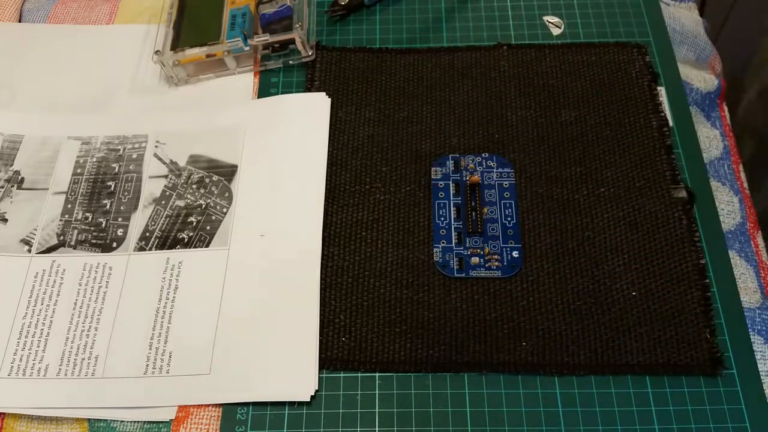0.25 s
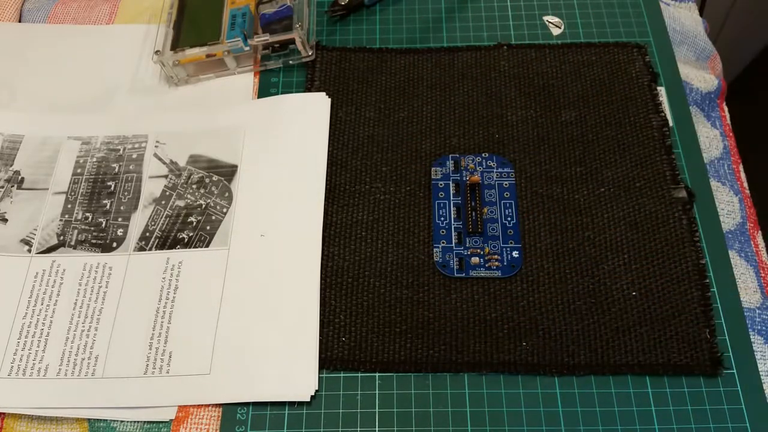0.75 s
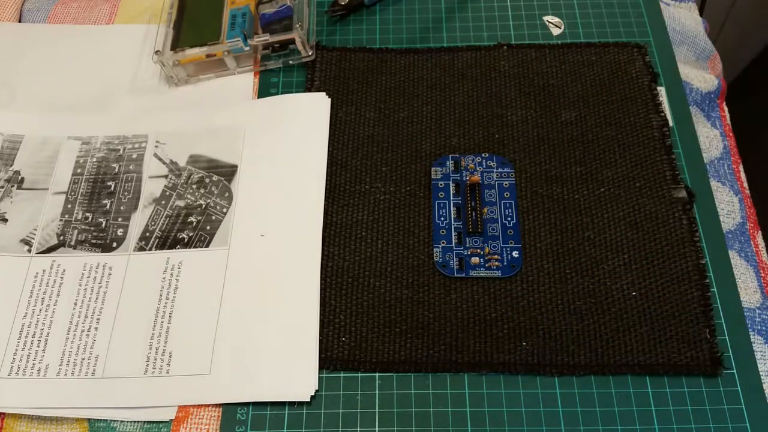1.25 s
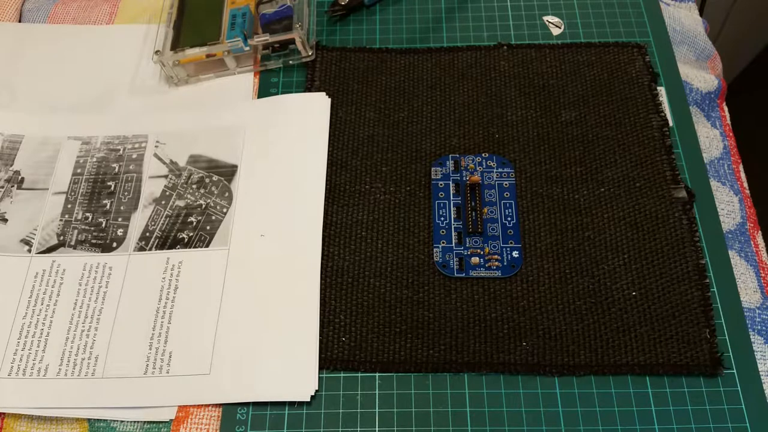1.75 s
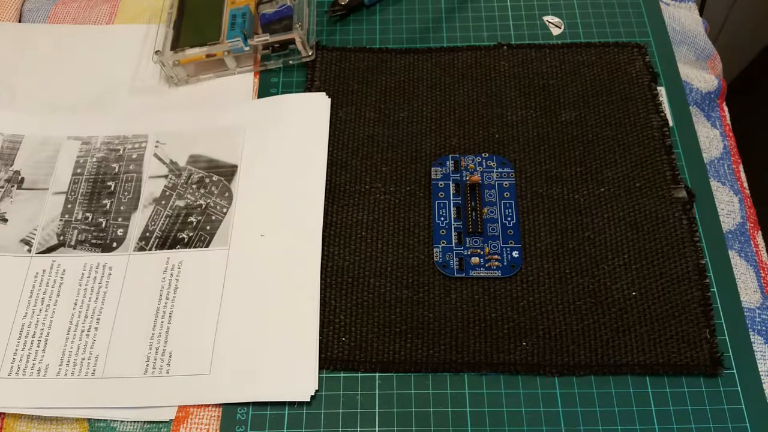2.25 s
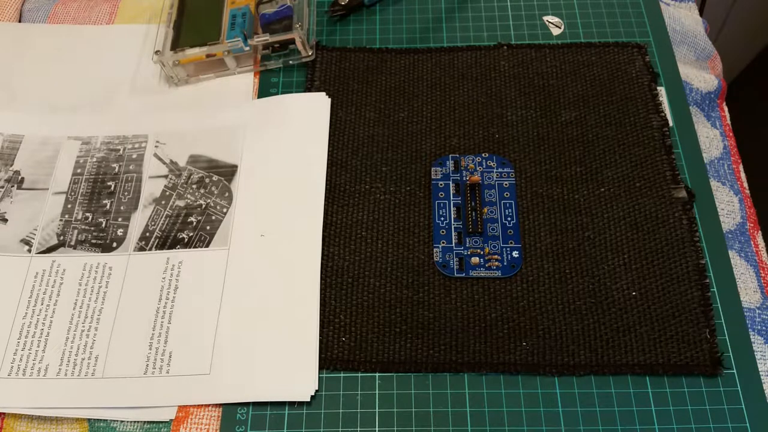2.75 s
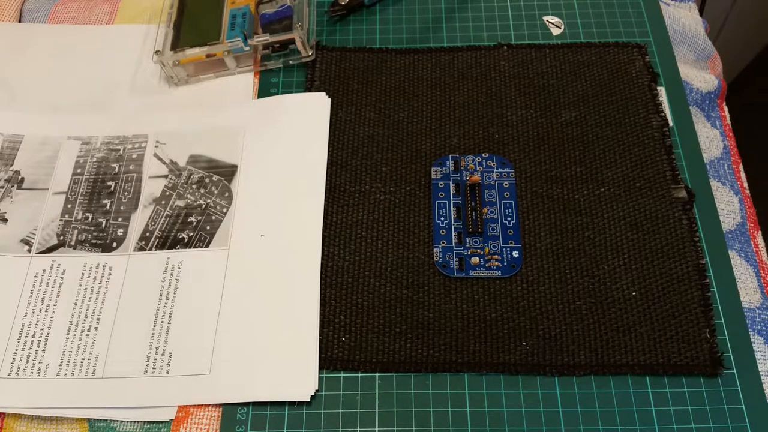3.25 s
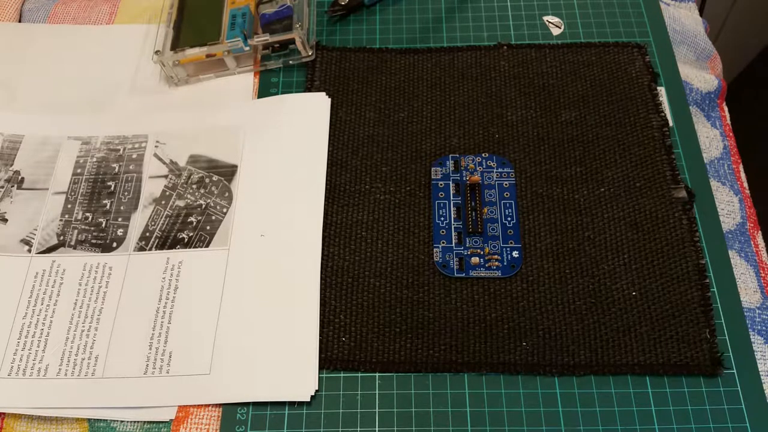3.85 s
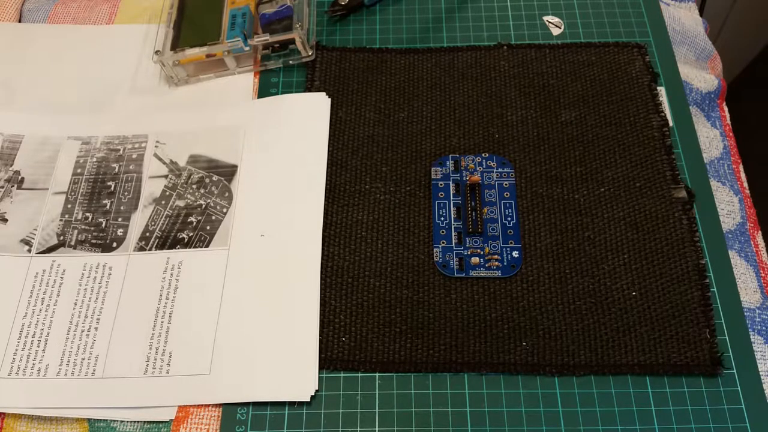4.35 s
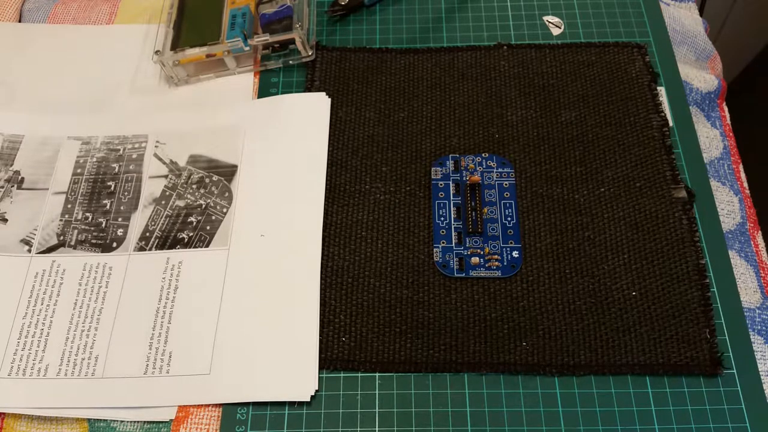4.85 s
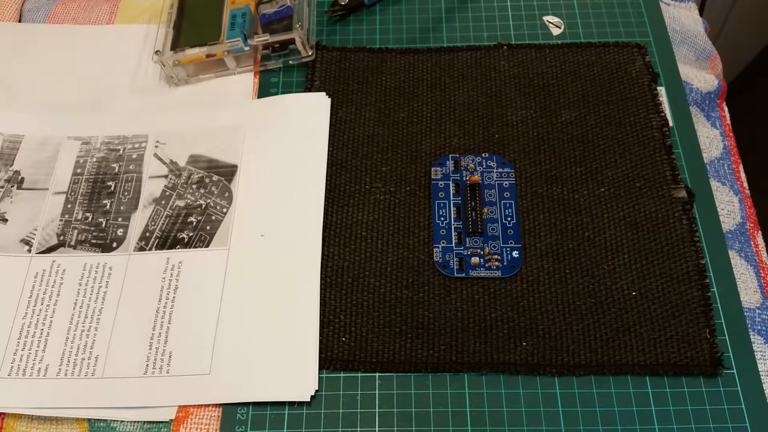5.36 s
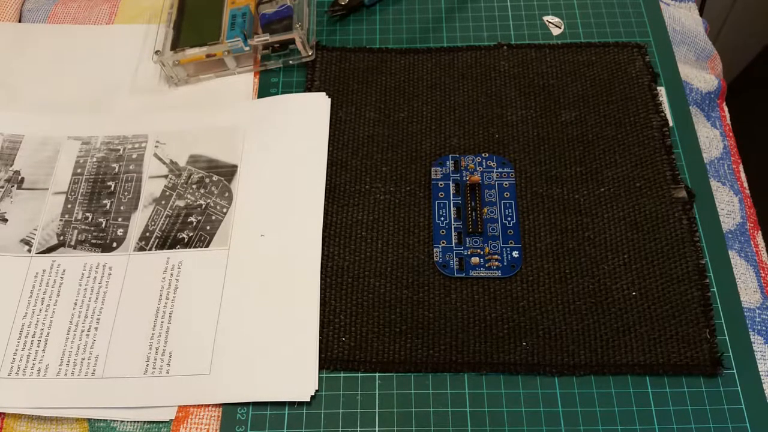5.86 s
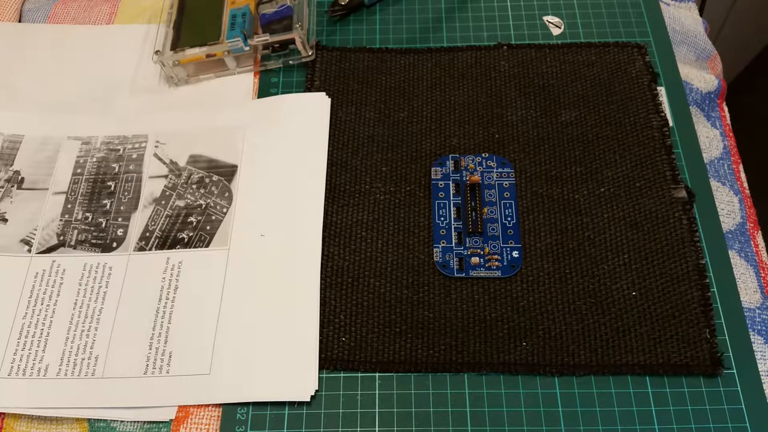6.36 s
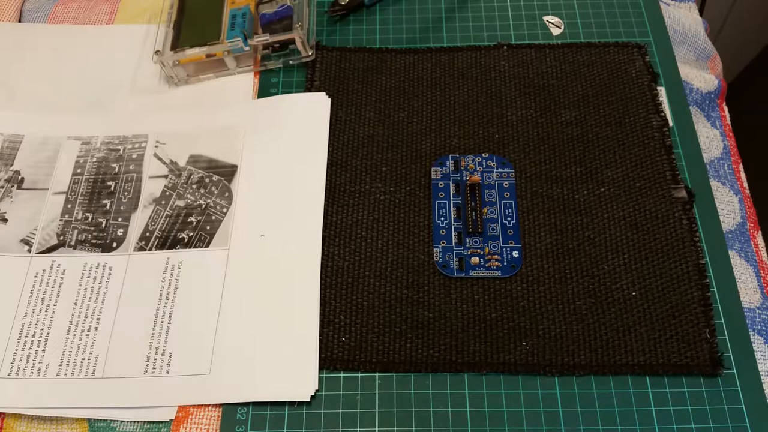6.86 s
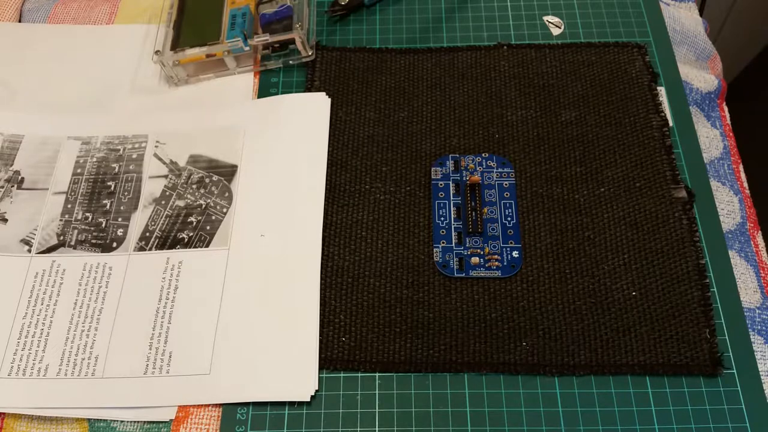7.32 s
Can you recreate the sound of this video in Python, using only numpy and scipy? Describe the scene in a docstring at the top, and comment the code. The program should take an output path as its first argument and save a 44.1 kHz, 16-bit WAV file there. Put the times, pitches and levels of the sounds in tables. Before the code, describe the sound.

In a small kitchen, a refrigerator compressor drones throughout, a deep hum around 100 hertz that swells and fades about every two seconds. Someone close by moves: cloth rubs softly, then a tight cluster of dull table bumps, later scratchier rustling and a few lighter knocks. A small fan whines faintly and another machine rumbles far off. The microphone is close to the table, with slight hiss.

```python
"""A refrigerator compressor hums in a kitchen: its shaft turns a little slower than the mains field,
so shaft tones and mains tones beat into a slow throb, built here from sines over casing noise.
Someone nearby shifts: soft bumps ring the table, and shaped noise makes the cloth rustles.
A small fan whines in sines over air noise, another machine rumbles far off in narrow bands of noise,
and the microphone adds a faint hiss."""
import sys
import numpy as np
from scipy import signal
from scipy.fft import rfft, irfft, next_fast_len
from scipy.io import wavfile
from scipy.ndimage import uniform_filter1d, map_coordinates

SR = 44100
rng = np.random.default_rng(int(sys.argv[2]) if len(sys.argv) > 2 else 0)


def wav_out(sig):
    """Save sig, one row per channel (or a flat mono array), as 16-bit PCM at SR to the path in sys.argv[1]."""
    wavfile.write(sys.argv[1], SR, np.round(np.clip(np.atleast_2d(sig).T, -1, 1) * 32767).astype(np.int16))


N = 334719
TIME_S = np.arange(N) / SR


def amp(db):
    """Turn decibels into a plain gain."""
    return 10 ** (np.asarray(db) / 20)


def unit(x):
    """Scale x to an rms of 1."""
    return x / np.sqrt(np.mean(x ** 2) + 1e-20)


def curves(rows):
    """Join the points into one value per sample, for each column after the time."""
    time_s, *columns = np.transpose(rows)
    return [np.interp(TIME_S, time_s, column) for column in columns]


def angle(hz):
    """Add up a speed per sample into the angle turned, in radians."""
    return 2 * np.pi * np.cumsum(hz) / SR


def wobble(rate):
    """Draw a smooth random curve with this many random points a second."""
    points = rng.standard_normal(int(N * rate / SR) + 4)
    return map_coordinates(points, [np.arange(N) * rate / SR])


def filtered(x, response):
    """Multiply the spectrum of x by a response that depends on frequency."""
    size = next_fast_len(N + SR)
    spectrum = rfft(x, size) * response(np.fft.rfftfreq(size, 1 / SR))
    return irfft(spectrum, size)[:N]


def coloured(x, points):
    """Shape white noise of rms 1 to a curve of decibels per Hz."""
    point_hz, point_db = np.transpose(points)

    def response(hz):
        db = np.interp(np.log(hz + 1), np.log(point_hz + 1), point_db, -200, -200)
        return amp(db) * np.sqrt(SR / 2)

    return filtered(x, response)


def patchy(depth_db):
    """Make white noise of rms 1 with random louder and softer patches in time and pitch."""
    spectrum = signal.stft(rng.standard_normal(N), nperseg=512)[2]
    across_pitch = uniform_filter1d(rng.standard_normal(spectrum.shape), 8, 0)
    patches = uniform_filter1d(across_pitch, 12, 1)
    noise = signal.istft(spectrum * amp(depth_db * unit(patches)), nperseg=512)[1]
    return unit(noise[:N])


# speed of the compressor shaft: start_s, turns_per_s
SHAFT_SPEED = [(0, 49.25), (2, 49.255), (2.6, 49.262), (4, 49.26), (5.5, 49.247), (7.6, 49.245)]
# compressor tones, level before slow changes: shaft_order, slip_sideband, rms_db,
# in_step_s (when the tone first falls in step with its order)
HUM_TONES = [(1, 0, -59, 0), (2, 0, -44, 0), (2, 1, -43.5, .45), (3, 1, -73, .4), (4, 0, -57, 0),
             (4, 1, -63, .18), (4, 2, -72, .12), (5, 0, -71, 0), (5, 1, -77, .1), (6, 0, -65, 0),
             (6, 1, -63, .262), (6, 3, -70, .083), (6, 4, -69, .07), (7, 1, -63, .446), (7, 4, -68, .124),
             (8, 0, -63, 0), (8, 4, -53, .058), (9, 0, -59, 0), (9, 1, -61, .41), (9, 2, -64, .057),
             (9, 4, -65, .107), (10, 0, -67, 0), (10, 5, -65, .089), (11, 0, -69, 0), (11, 5, -68, .085)]
# tones whose level and lag change as the microphone shifts place near 2.1 s:
# shaft_order, slip_sideband, early_change_db, early_lag_rad
SHIFTING_TONES = [(2, 0, -4.5, 0), (2, 1, 1, .4), (4, 0, 1, 1.1), (4, 1, 2, .9), (5, 1, 17, 0),
                  (7, 1, -7, 0)]
# level of the one wavering tone: start_s, change_db
WAVER_LEVEL = [(0, 8), (.5, 7), (1, 3), (1.7, 6), (2.2, 0), (3.3, -6), (4.8, 1), (5.7, 0), (6.1, -2),
               (6.5, 3), (7.6, 0)]
# noise of the casing: pitch_hz, level_db_per_hz
CASING_NOISE = [(12, -85.5), (24, -80), (40, -74.5), (75, -73), (115, -76.5), (150, -80.5), (235, -80),
                (280, -82.5), (410, -73), (520, -80.5), (800, -87.5), (1050, -95.5), (1550, -99),
                (1800, -108), (2500, -130)]
PULL_HZ = 100.417  # the magnetic pull, twice per mains cycle
SHIFT_S, SHIFT_SPREAD_S = 2.1, .25  # middle and pace of the shift, seconds
WAVERING_TONE = (8, 4)  # shaft order and sideband of the tone near 402 Hz


def compressor():
    """Each multiple of the shaft speed has side tones, spaced by how far the shaft slips behind the pull."""
    shaft = angle(curves(SHAFT_SPEED)[0])
    slip = 2 * np.pi * PULL_HZ * np.arange(N) / SR - 2 * shaft
    start = rng.uniform(0, 2 * np.pi, size=12)
    # falls smoothly from 1 to 0 over the shift
    before_shift = 1 / (1 + np.exp((TIME_S - SHIFT_S) / SHIFT_SPREAD_S))
    change_db = {(order, band): db * before_shift for order, band, db, _ in SHIFTING_TONES}
    lag = {(order, band): rad * before_shift for order, band, _, rad in SHIFTING_TONES}
    change_db[WAVERING_TONE] = curves(WAVER_LEVEL)[0] + 1.5 * wobble(6)
    hum = np.zeros(N)
    for order, band, db, in_step_s in HUM_TONES:
        slip_since = slip - slip[round(in_step_s * SR)]
        phase = start[order] + order * shaft + band * slip_since - lag.get((order, band), 0)
        unsteady_db = .15 * order * wobble(1.5)  # higher orders waver more in level, slowly and at random
        level_db = db + change_db.get((order, band), 0) + unsteady_db
        hum += amp(level_db) * np.sqrt(2) * np.cos(phase)
    casing = coloured(patchy(depth_db=1.37), CASING_NOISE)
    return hum + amp(1.6 * wobble(2.254)) * casing


# ways the table rings, relative level: pitch_hz, width_hz, level_db
TABLE_MODES = [(64.3, 7, -5.5), (80, 16, -2.5), (96.4, 18, -1), (119, 19, -6.5), (173.6, 14, -4.5),
               (228, 22, -5), (453, 75, -4), (763, 130, -11.5), (1050, 130, -8.5), (1400, 160, -21)]
# bumps on the table, peak of the thud itself: start_s, peak_db, contact_ms
TABLE_BUMPS = [(1.211, -42, 16), (1.577, -30, 2.1), (1.58, -29, 7.5), (1.587, -29, 2.23),
               (1.597, -26.5, 1.7), (1.612, -31.5, 9.1), (1.628, -29.5, 2.55), (1.642, -28.5, 13.1),
               (1.711, -33, 1.9), (1.714, -27, 9.1), (1.731, -28, 4.23), (1.737, -28, 11),
               (1.791, -32.5, 16), (1.872, -38, 9.4), (4.532, -40, 6), (4.552, -39, 6.3),
               (4.761, -35.5, 3.9), (4.787, -35, 2.9), (4.932, -33, 4.4), (4.955, -37, 2.9),
               (6.597, -37.5, 1.17), (6.608, -35, 1.16)]
# tone colour of the crack at each touch, relative level: pitch_hz, level_db_per_hz
TOUCH_COLOUR = [(400, -32), (700, 10.5), (1300, -3), (2000, -22), (2800, -7), (4000, -20), (8200, -28),
                (11300, -24), (15800, -25)]
CRACK_DB, SOFTENING_DB_PER_MS = -16.5, 2.6  # crack against the bump; slower contact cracks less


def bumps():
    """A push and release rings the table modes near its own pace; a short noise burst marks the touch."""
    def table(hz):
        response = 0
        for k, (mode_hz, width_hz, db) in enumerate(TABLE_MODES):
            damping = 1j * hz * width_hz
            response = response + (-1) ** k * amp(db) * damping / (mode_hz ** 2 - hz ** 2 + damping)
        return response

    ring = filtered(signal.unit_impulse(N), table)[:SR // 2]
    thuds, crack_gain = np.zeros(N + SR), np.zeros(N + SR)
    t = np.arange(SR // 4) / SR
    for start_s, db, contact_ms in TABLE_BUMPS:
        first = round(start_s * SR)
        push_and_release = np.diff(np.hanning(round(contact_ms * SR / 1000) + 3))
        blow = signal.fftconvolve(ring, push_and_release)
        thuds[first:][:len(blow)] += amp(db) * blow / np.abs(blow).max()
        crack_db = db + CRACK_DB - SOFTENING_DB_PER_MS * contact_ms
        crack_gain[first:][:len(t)] += amp(crack_db - 60 * t / 0.081)  # loses 60 dB in 0.081 s
    crack_noise = unit(coloured(rng.standard_normal(N), TOUCH_COLOUR))
    return thuds[:N] + crack_gain[:N] * crack_noise


def kitchen(x, wet_db, t60):
    """The room adds a short fading tail of noise that loses 60 dB in t60 seconds."""
    t = np.arange(SR // 2) / SR
    tail = rng.standard_normal(len(t)) * amp(-60 * t / t60) * (t > .004)  # a 4 ms gap first
    return x + amp(wet_db) * signal.fftconvolve(x, tail / np.linalg.norm(tail))[:N]


# faint stirring under the strokes, before its random wobble: start_s, dull_rub_db
FAINT_STIRRING = [(0, -66), (1.3, -66), (2, -61), (3.1, -70.5), (3.4, -83), (3.9, -66.5), (5, -69),
                  (5.6, -75), (6.5, -81), (7.6, -77)]
# cloth strokes, levels at the peak: peak_s, swell_s, fade_s, dull_rub_db, scrape_db, crisp_top_db
CLOTH_STROKES = [(.06, 0.082, .1, -65, -73, -71), (0.632, 0.057, 0.09, -55, -71, -76),
                 (1.06, .08, .08, -69, -74, -76), (1.27, 0.17, 0.15, -62, -67.5, -74),
                 (1.482, 0.077, 0.12, -56, -67.5, -75), (1.578, 0.0055, 0.057, -43, -65, -72),
                 (1.652, .04, .04, -53, -64, -66), (1.745, 0.15, 0.085, -48, -58.5, -63),
                 (2.3, 0.045, 0.091, -59, -65.5, -77.5), (2.85, 0.085, 0.09, -60, -74, -84),
                 (3.512, 0.038, .06, -54.5, -66, -74), (3.578, 0.074, 0.067, -56.5, -61, -65),
                 (3.68, 0.043, 0.092, -52.5, -58, -64), (3.725, 0.05, 0.076, -58.5, -57, -65.5),
                 (3.831, .04, 0.071, -53.5, -56, -65.5), (4.018, 0.11, 0.05, -61, -66.5, -77),
                 (4.43, 0.16, .1, -58.5, -65, -75), (4.524, 0.06, 0.051, -49.5, -49, -55),
                 (4.62, 0.046, 0.078, -62, -60, -68.5), (4.72, 0.043, 0.071, -58, -59.5, -72),
                 (4.798, .05, 0.065, -56.5, -62, -71), (5.388, 0.22, 0.12, -64.5, -71, -81),
                 (5.868, .15, 0.13, -68.5, -80, -92), (6.132, .12, .12, -71, -80, -90),
                 (6.606, 0.018, 0.062, -53.5, -59.5, -64.5), (6.908, 0.28, 0.12, -68, -73, -90)]
SCRAPE_DB, CRISP_DB = -10, -20  # scrape and crisp top of the stirring, against its dull rub
RISE_DB, FALL_DB = 17, 11  # gained over the swell, lost over the fade


def stirring():
    """Movement sets the gains of rub, scrape and crisp top: strokes swell and fade over an uneven bed."""
    part_db = np.array([[0], [SCRAPE_DB], [CRISP_DB]])
    bed_db = curves(FAINT_STIRRING)[0] + 2.16 * wobble(6.89) + part_db
    power = amp(bed_db) ** 2
    for peak_s, swell_s, fade_s, *db in CLOTH_STROKES:
        swelling_db = RISE_DB * (TIME_S - peak_s) / swell_s
        fading_db = FALL_DB * (peak_s - TIME_S) / fade_s
        shape_db = np.where(TIME_S < peak_s, swelling_db, fading_db)
        power = power + amp(db)[:, None] ** 2 * amp(2 * shape_db)  # doubled dB, as this is power
    return np.sqrt(power)


# tone colour of the dull rub, relative level: pitch_hz, level_db_per_hz
RUB_COLOUR = [(400, -26), (700, 10), (1000, 4), (1400, 4), (1900, -1.5), (2400, -2.5), (3000, -31),
              (4000, -48)]
# tone colour of the scrape, relative level: pitch_hz, level_db_per_hz
SCRAPE_COLOUR = [(1700, -5), (2300, 1.5), (2600, 1.5), (3100, 0.5), (3550, 2), (4100, 3.5), (4800, -4),
                 (5600, -9.5), (6800, -7.5), (8200, -21.5), (9500, -53)]
# tone colour of the crisp top, relative level: pitch_hz, level_db_per_hz
CRISP_COLOUR = [(7600, -20.5), (8600, -16.5), (9600, -8), (11300, -0.5), (13000, -5), (15800, -4.5)]
# tone colour of the thin high swish, relative level: pitch_hz, level_db_per_hz
SWISH_COLOUR = [(10800, -30), (11300, -6), (11900, -1), (12400, -5), (12900, -30)]
# short pitched creaks: start_s, pitch_hz, peak_db, length_ms
CREAKS = [(1.059, 1050, -58, 52), (1.713, 1264, -44, 15), (3.495, 1237, -53, 18), (3.565, 1415, -48.5, 21),
          (3.655, 1245, -49, 14), (3.715, 3160, -52.5, 17), (3.725, 1340, -54, 12), (4.52, 3090, -52, 24),
          (4.54, 4050, -57, 25), (4.552, 3100, -56, 18)]
SWISH_S, SWISH_DB, SWISH_T60_S = 1.639, -62, .3  # start, first level, time to lose 60 dB


def rustle():
    """Cloth and skin rub: dense tiny slips of uneven size, a few of them catching as a pitched creak."""
    def slips():
        return rng.standard_normal(N) * amp(1.2 * wobble(300) + 1.1 * wobble(60))

    out = np.zeros(N)
    for gain, colour in zip(stirring(), (RUB_COLOUR, SCRAPE_COLOUR, CRISP_COLOUR)):
        out += gain * unit(coloured(slips(), colour))
    after_s = TIME_S - SWISH_S
    swish_gain = (after_s > 0) * amp(SWISH_DB - 60 * np.abs(after_s) / SWISH_T60_S)
    out += swish_gain * unit(coloured(slips(), SWISH_COLOUR))
    for start_s, hz, db, length_ms in CREAKS:
        t = np.arange(round(length_ms * SR / 1000)) / SR
        creak = np.sqrt(np.hanning(len(t))) * np.sin(2 * np.pi * hz * t)
        out[round(start_s * SR):][:len(t)] += amp(db) * creak
    return out


# moments when the fan comes under load: start_s
FAN_LOADS = [.93, 5.12]
FAN_HZ, SAG_HZ = 72.2, .29  # free speed, and the loss that a long load would reach
SAG_HOLD_S, SAG_LAG_S = 1.05, .45  # time under load, and the delay from inertia


def fan_speed():
    """The fan's speed lags behind each spell of load and recovers after it."""
    def lagging(start_s):
        return 1 - np.exp(-np.maximum(TIME_S - start_s, 0) / SAG_LAG_S)

    return FAN_HZ - SAG_HZ * sum(lagging(s) - lagging(s + SAG_HOLD_S) for s in FAN_LOADS)


# whine of blades and motor slots, level before its wobble: order (multiple of fan speed), rms_db
FAN_TONES = [(8, -64), (9, -75), (10, -72), (11, -73), (13, -81), (16, -85), (22, -81), (30, -86),
             (31, -72), (32, -71), (34, -85), (42, -90)]
# air noise of the fan: pitch_hz, level_db_per_hz
FAN_AIR = [(1200, -115), (1850, -109), (2300, -100), (2600, -106), (3300, -112), (4100, -103), (4600, -107),
           (5100, -117), (5750, -120), (6600, -117), (7300, -122), (8000, -132), (9000, -150)]


def fan():
    """Blades and motor slots sound at multiples of the fan's sagging speed, over its air noise."""
    turn = angle(fan_speed())
    whine = np.zeros(N)
    for order, db in FAN_TONES:
        phase = order * turn + rng.uniform(0, 2 * np.pi)
        whine += amp(db + 1.05 * wobble(2.89)) * np.sqrt(2) * np.cos(phase)
    air_gain = amp(0.2 * wobble(2.56) + 0.89 * wobble(5.2))
    return whine + air_gain * coloured(patchy(depth_db=1.26), FAN_AIR)


# low wavering tones of the far machine: pitch_hz, width_hz, rms_db
FAR_RUMBLE = [(31.9, .5, -58), (46.5, 2, -62), (65.2, 1.2, -62)]


def far_machine():
    """The far machine's low tones waver, made as very narrow bands of noise."""
    out = np.zeros(N)
    for centre_hz, width_hz, db in FAR_RUMBLE:
        def band(hz):
            return np.exp(-((hz - centre_hz) / width_hz) ** 2)

        out += amp(db) * unit(filtered(rng.standard_normal(N), band))
    return out


def scene():
    """Add the compressor, the person close by, the fan and the far machine."""
    near = kitchen(bumps(), wet_db=-7, t60=0.3) + rustle()
    return (compressor() + near + fan() + far_machine())[None]


# hiss of the microphone: pitch_hz, level_db_per_hz
MICROPHONE_HISS = [(7000, -150), (8600, -131), (9500, -126), (10300, -122), (11500, -118), (12900, -116),
                   (14000, -115), (14800, -112), (15800, -111)]
TOP_HZ = 15750  # the microphone's band limit


def record(dry):
    """The microphone adds its own treble hiss and keeps nothing above its band limit."""
    hiss = amp(0.45 * wobble(3)) * coloured(patchy(depth_db=1.5), MICROPHONE_HISS)
    return filtered(dry[0] + hiss, lambda hz: hz < TOP_HZ)[None]


dry = scene()
out = record(dry)
wav_out(out)
```